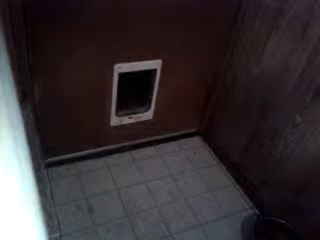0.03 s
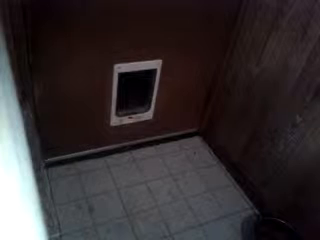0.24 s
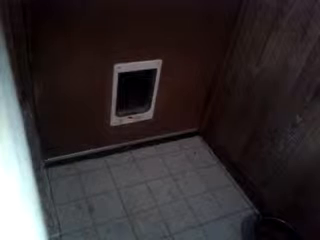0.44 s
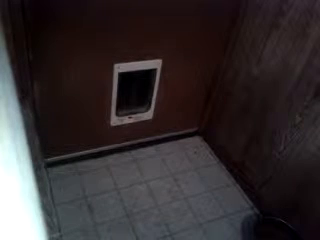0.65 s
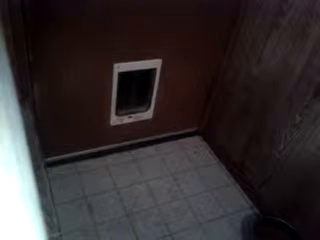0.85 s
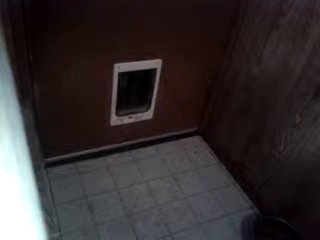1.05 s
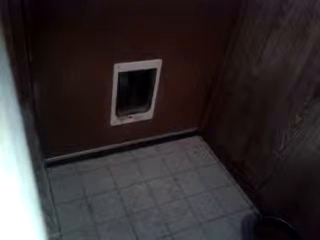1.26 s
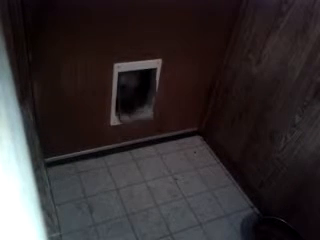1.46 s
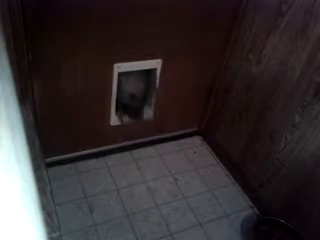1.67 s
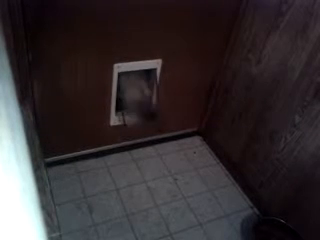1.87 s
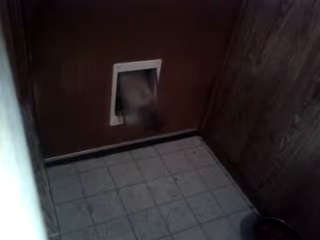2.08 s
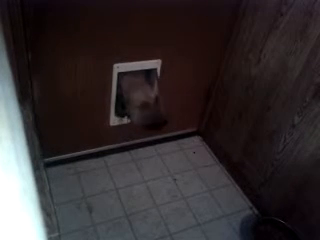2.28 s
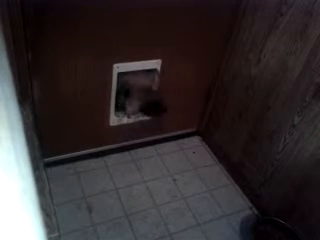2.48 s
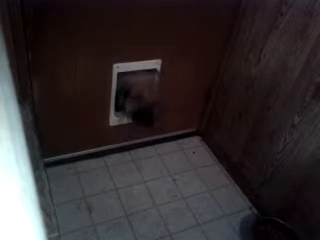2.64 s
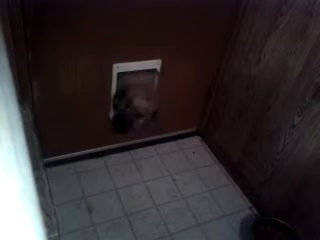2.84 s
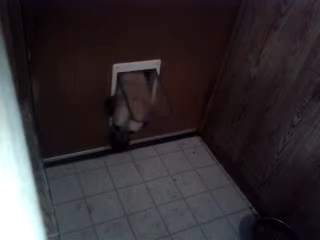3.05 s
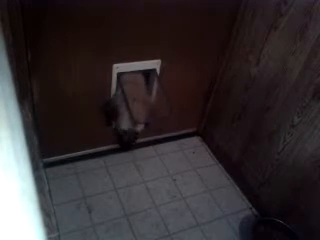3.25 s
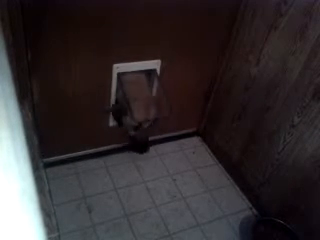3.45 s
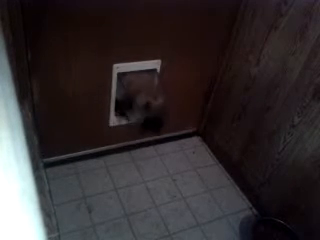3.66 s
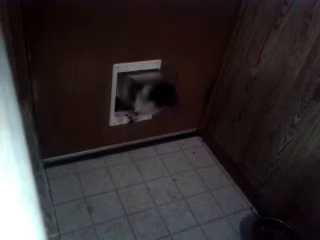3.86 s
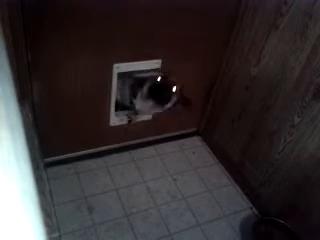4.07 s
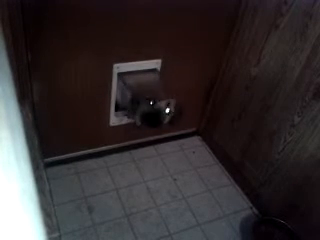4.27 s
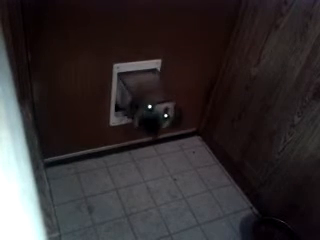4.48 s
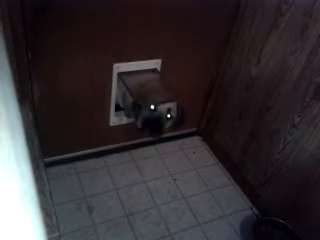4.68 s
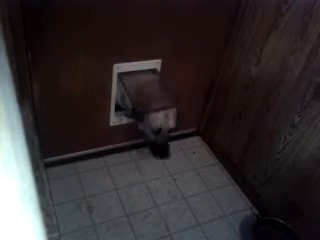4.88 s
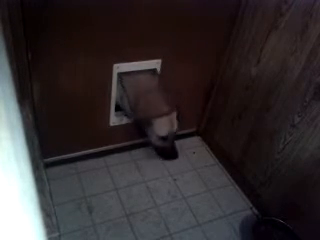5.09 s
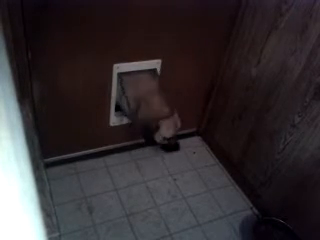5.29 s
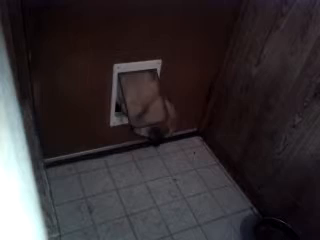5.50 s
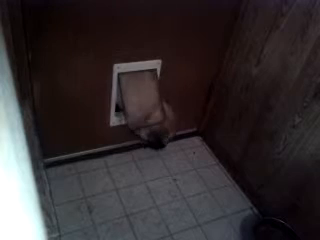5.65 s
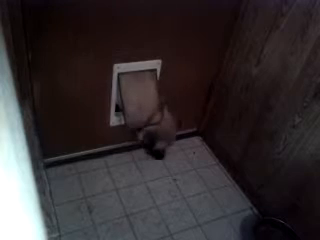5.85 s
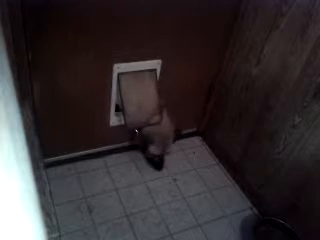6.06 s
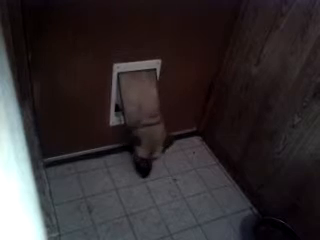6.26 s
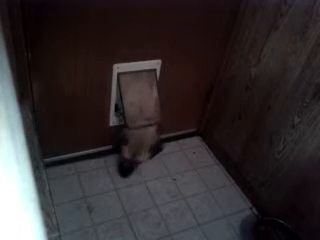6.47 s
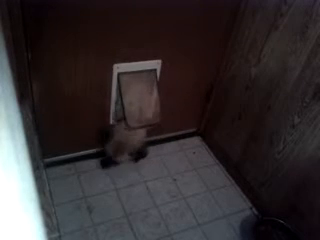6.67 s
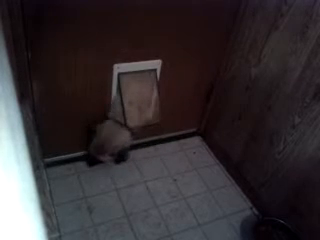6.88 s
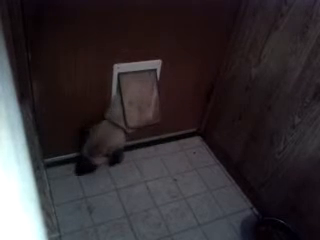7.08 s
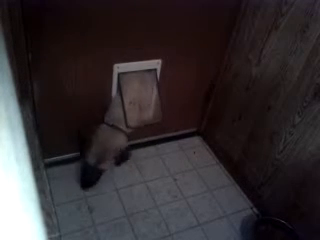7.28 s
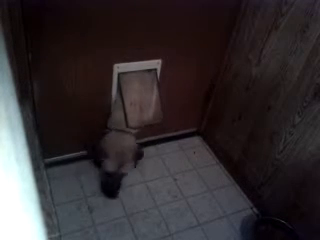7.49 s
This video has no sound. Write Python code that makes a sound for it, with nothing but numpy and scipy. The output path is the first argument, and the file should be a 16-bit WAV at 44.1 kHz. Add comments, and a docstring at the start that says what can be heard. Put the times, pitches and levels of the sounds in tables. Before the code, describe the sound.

In a small tiled room, a plastic pet door knocks and rattles in uneven clusters as a dog squeezes through, making the wooden door boom hollowly. Brushing fur and small metal tag clinks mix with the busiest clatter. The bumps then grow sparser and softer, with a low groan from the door near the end. A faint hum, microphone hiss and thin buzz continue underneath.

```python
"""A dog squeezes through a plastic pet flap into a small tiled room.
A faint machine hum, microphone hiss and a thin buzz run throughout. At 1.5 s the dog noses the flap:
flap and frame knock and set the hollow wooden door booming. From 2.3 s collar tags clink, then fur
rubs along the rattling flap. The heaviest bump lands near 4.3 s and the knocks thin out. The hum
swells briefly at 5.6 s; a last rub, a soft groan of the door and a clink lead to a dull bump at 7.5 s."""
import sys
import numpy as np
from scipy import signal
from scipy.fft import rfft, irfft, next_fast_len
from scipy.io import wavfile
from scipy.ndimage import uniform_filter1d

SR = 44100
rng = np.random.default_rng(int(sys.argv[2]) if len(sys.argv) > 2 else 0)


def int16_out(signal):
    """Quantize to a 16-bit WAV file."""
    q = np.round(np.clip(np.atleast_2d(signal).T, -1, 1) * 32767)
    wavfile.write(sys.argv[1], SR, q.astype(np.int16))


N = 332204
RING_TIME = np.arange(SR) / SR  # the one second each hit has to ring out


def amp(db):
    """Decibels to gain."""
    return 10 ** (np.asarray(db) / 20)


def unit(x):
    """Scale to rms 1."""
    return x / np.sqrt(np.mean(x ** 2))


def between(ends, share):
    """The value a share of the way from one end to the other."""
    return ends[0] + share * (ends[1] - ends[0])


def add(out, start_s, x):
    """Mix x in at its cue."""
    i = max(int(start_s * SR), 0)
    out[i:i + len(x)] += x[:max(len(out) - i, 0)]


def colour(x, curve):
    """EQ a steady sound with a curve of (frequency [Hz], level [dB]) points, at rms 1."""
    hz, db = np.transpose(curve)
    size = next_fast_len(len(x))
    bin_hz = np.maximum(np.arange(size // 2 + 1) * SR / size, 1)
    eq = amp(np.interp(np.log(bin_hz), np.log(hz), db))
    return unit(irfft(rfft(x, size) * eq, size)[:len(x)])


def wander(rate_hz):
    """Smooth random modulation at rms 1."""
    hold = int(SR / rate_hz)
    steps = np.repeat(rng.standard_normal(N // hold + 1), hold)
    return unit(uniform_filter1d(uniform_filter1d(steps, hold), hold)[:N])


def fade(t60):
    """Exponential decay, 60 dB down after t60 seconds."""
    return np.exp(-np.log(1000) * RING_TIME / t60)


def modes(table):
    """One decaying sine for each mode."""
    return np.array([amp(db) * fade(t60) * np.sin(2 * np.pi * hz * RING_TIME) for hz, db, t60 in table])


def swell(length_s):
    """A smooth fade in and out."""
    return np.hanning(int(length_s * SR))


def resonate(x, hz, q, db):
    """Layer a resonant band of x back over it."""
    return x + amp(db) * signal.lfilter(*signal.iirpeak(hz, q, fs=SR), x)


# EQ of the room air and hiss: (frequency [Hz], relative level [dB])
AIR_EQ = [(12, -32.5), (20, -5), (36, -0.5), (59, 4), (102, -11.5), (184, -10.5), (236, -12.5),
          (288, -10.5), (406, -19), (460, -16.5), (589, -18), (1470, -30), (1970, -28), (2720, -32.5),
          (6450, -35), (7300, -43.5), (9490, -77), (16100, -120)]


def room_tone(level_db=-54.5, flutter_db=-0.1):
    """A bed of room air and microphone hiss, its level barely moving."""
    air = colour(rng.standard_normal(N), AIR_EQ)
    return air * amp(level_db + flutter_db * wander(2.1))


# EQ of the buzz: (frequency [Hz], relative level [dB])
BUZZ_EQ = [(300, -22), (600, -3.5), (1200, -0.5), (1600, -2), (2050, 1.5), (2400, -8), (4000, -15),
           (7000, -21)]


def microphone_buzz(pitch_hz=94.4, level_db=-73):
    """Evenly spaced ticks fuse into a thin buzz."""
    cycles = np.cumsum(pitch_hz * (1 + .001 * wander(4))) / SR
    ticks = np.diff(np.floor(cycles), prepend=0)
    return amp(level_db) * colour(ticks - ticks.mean(), BUZZ_EQ)


# Tones of the machine's drone: (frequency [Hz], level [dB], wobble depth [ratio])
HUM_TONES = [(37, -80.5, 0.35), (53.05, -57, 0.2), (58.2, -58.5, 1), (85.4, -76, 0.17), (114.9, -67, 0.86),
             (182.2, -68, 0.17), (237.9, -62, 0.15), (355.5, -77.5, 0.2), (401, -72, 0.092)]


def machine_hum(drift_hz=0.585):
    """Low machine tones beat and wander."""
    out = np.zeros(N)
    for hz, db, wobble in HUM_TONES:
        phase = 2 * np.pi * np.cumsum(hz + drift_hz * wander(3.062)) / SR
        tone = (1 + wobble * wander(11)) * np.sin(phase)
        smear = wobble * wander(12) * np.cos(phase)
        out += amp(db) * unit(tone + smear)
    return out


# Low swell cues: (time [s], length [s], pitch [Hz], peak level [dB])
# The 58 Hz cue is a brief swell of the machine hum; in the others the door gives under the dog's weight.
LOW_SWELLS = [(1.89, 0.058, 45, -40), (2.88, 0.11, 148.7, -48.5), (3.212, 0.094, 154, -36),
              (4.28, 0.34, 37.8, -45.5), (4.94, 0.19, 150.6, -48.5), (5.571, .13, 58, -43.5),
              (6.05, 0.34, 178.2, -57), (6.95, 0.56, 157.4, -57.5)]


def low_swells(waver=0.024):
    """Single low tones fade in and out, slightly unsteady in pitch."""
    out, drift = np.zeros(N), wander(30)
    for start_s, length_s, hz, db in LOW_SWELLS:
        envelope = swell(length_s)
        pitch = hz * (1 + waver * drift[int(start_s * SR):][:len(envelope)])
        tone = np.sqrt(2) * np.sin(2 * np.pi * np.cumsum(pitch) / SR)
        add(out, start_s, amp(db) * envelope * tone)
    return out


# Fur cues: (time [s], length [s], peak level [dB])
FUR_RUBS = [(2.55, 0.35, -52), (2.939, 0.14, -46.5), (3.05, 0.15, -49.5), (3.396, 0.32, -55.5),
            (3.894, 0.22, -59.5), (6.71, 0.28, -57)]
# EQ of fur on plastic: (frequency [Hz], relative level [dB])
FUR_EQ = [(150, -31), (400, 12.5), (800, 6), (1200, 1), (1800, -10), (2300, -7.5), (2650, -8.5),
          (3300, -14), (5000, -24.5), (7000, -27.5)]


def fur_rubs(grain_db=2.5):
    """Hair catches and slips on the flap's edge in quick, grainy strokes."""
    pressure = np.zeros(N)
    for start_s, length_s, db in FUR_RUBS:
        add(pressure, start_s, amp(db) * swell(length_s))
    grain = amp(grain_db * wander(250))
    return pressure * colour(rng.standard_normal(N) * grain, FUR_EQ)


# The large tag's two modes, then the small tag's one: (frequency [Hz], relative level [dB], t60 [s])
TAG_MODES = [(6280, -3, .11), (6376, 0, .13), (7100, 8, .13)]
# Clink cues: (time [s], level before the tags' gain [dB], scrape trim [dB])
TAG_CLINKS = [(2.27, -57, -4), (2.597, -55, -2.5), (2.976, -55, -8), (3.041, -60.5, 3),
              (4.024, -47.5, -1.5), (4.041, -49, -5), (4.488, -65, -9), (5.351, -54.5, -3), (5.85, -64, -1),
              (6.477, -56.5, -6), (7.123, -62, 7)]


def collar_tags(gain_db=-8, small_tag_db=-14, room_db=-3, room_t60=.18, scrape_t60=.22, low_cut_hz=2400):
    """Two metal discs scrape together and ring briefly; the tiles scatter the ring."""
    out, partials = np.zeros(N), modes(TAG_MODES)
    attack = slice(SR // 100)
    low_cut = signal.butter(2, low_cut_hz, "highpass", fs=SR, output="sos")
    direct = partials[0] + partials[1] + amp(small_tag_db) * partials[2]
    for start_s, db, scrape_db in TAG_CLINKS:
        echoes = rng.standard_normal(SR) * fade(room_t60)
        reverb = signal.fftconvolve(direct, echoes / np.linalg.norm(echoes))[:SR]
        ring = direct + amp(room_db) * reverb
        scrape = 2 * signal.sosfilt(low_cut, rng.standard_normal(SR) * fade(scrape_t60))
        clink = ring / np.std(ring[attack]) + amp(scrape_db) * scrape
        add(out, start_s, amp(db + gain_db) * clink)
    return out


def hits(cues, thud_range_db, return_s, rebound_db, rebound_hardness, cushion_s):
    """Each hit and its cushioned rebound as the part swings back; ranges run softest to hardest."""
    contact_range_s = (0.0024, 0.0022)
    for start_s, db, hardness, spot_hz in cues:
        thud_db = between(thud_range_db, hardness)
        yield start_s, db, hardness, spot_hz, thud_db, between(contact_range_s, hardness)
        yield start_s + return_s, db + rebound_db, rebound_hardness * hardness, spot_hz, thud_db, cushion_s


# Bump cues: (time [s], level before band trims [dB], hardness [0-1], pitch the spot favours [Hz])
FRAME_BUMPS = [(1.461, -35, 0.53, 570), (1.479, -33, 0.49, 290), (1.558, -42, 0.53, 750),
               (1.66, -44, 0.34, 482), (1.929, -38.5, 0.44, 500), (1.951, -33.5, 0.19, 1040),
               (2.079, -29, 0.42, 295), (2.2, -38, .03, 333), (2.562, -40.5, 0.65, 770),
               (2.665, -39, 0.5, 440), (2.686, -34, .45, 620), (2.709, -30, 0.3, 720),
               (2.772, -35, 0.44, 620), (2.81, -33.5, 0.26, 490), (2.831, -37, 0.1, 555),
               (2.955, -33.5, 0.61, 890), (3.528, -41.5, 0.57, 350), (3.762, -35, 0.61, 655),
               (3.799, -32.5, 0.54, 690), (3.958, -48, 0.71, 410), (4.131, -44.5, 0.25, 560),
               (4.259, -27, 0.26, 700), (4.275, -38, .05, 360), (4.616, -44, 0, 350), (4.798, -40, 0, 517),
               (5.184, -35.5, 0.4, 516), (5.692, -40, .15, 445), (5.75, -44.5, .3, 447),
               (6.899, -42, 0.17, 610), (7.482, -50.5, .03, 605)]


def frame_bumps():
    """The dog's body bumps the frame and the door behind it; softer hits carry more thud."""
    return hits(FRAME_BUMPS, thud_range_db=(3, -4.5), return_s=.044,
                rebound_db=-10, rebound_hardness=0.62, cushion_s=0.0071)


# Clack cues: (time [s], level before band trims [dB], hardness [0-1], pitch the spot favours [Hz])
FLAP_CLACKS = [(1.497, -41, .45, 500), (2.057, -32, 0.59, 540), (2.106, -36.5, 0.45, 720),
               (2.574, -36, 0.82, 3640), (2.597, -37.5, 0.75, 3600), (2.617, -30, .53, 1110),
               (2.975, -36.5, .55, 340), (3.043, -42, .8, 2600), (3.095, -40, 0.89, 950),
               (3.125, -41, 0.83, 2630), (3.164, -41, 0.76, 900), (3.297, -37.5, 1, 3100),
               (3.424, -36.5, 0.82, 2600), (3.876, -49.5, 0.74, 750), (4.25, -38.5, 0.87, 2630),
               (5.918, -40.5, 0.7, 450)]


def flap_clacks():
    """The light flap clacks by itself, with little low end and a quick rebound."""
    return hits(FLAP_CLACKS, thud_range_db=(-10.5, -9.5), return_s=.02,
                rebound_db=-5, rebound_hardness=0.76, cushion_s=0.011)


# Modes of the door panel, frame and flap: (frequency [Hz], relative level [dB], t60 [s])
DOOR_MODES = [(151.4, -3, 1), (167.5, 4, 0.22), (190, -13, 0.99), (219.1, 4, 0.22), (250.2, -3, 0.31),
              (292.7, -2.5, 0.43), (354.8, -0.5, 0.38), (395, -10.5, 0.54), (448.3, 4, 0.25),
              (491.2, 1.5, .26), (519, -1.5, 0.11), (548.5, -4.5, 0.2), (600, -2, 0.22), (649, -7.5, 0.32),
              (684, -0.5, 0.15), (748.5, -2, 0.14), (817.5, -8, .2), (932, -15.5, 0.18), (995, -12, 0.26),
              (1068, -8, 0.22), (1150, -13, .2), (1200, -10.5, 0.22), (1403, -9, 0.15), (1450, -29.5, 0.23),
              (1824, -15.5, 0.15), (2435, -25, 0.21), (2550, -28.5, .25), (2670, -21, 0.23),
              (2880, -26, 0.18), (3120, -20.5, 0.092), (3500, -25, 0.12)]
# EQ of the dense ring of plastic and tiled room: (frequency [Hz], relative level [dB])
CLATTER_EQ = [(100, 0), (170, -7.5), (320, -4.5), (500, 5), (720, -7), (880, -7.5), (1100, -6.5),
              (1350, -12.5), (1800, -15.5), (2200, -22), (2800, -22), (4000, -28), (5500, -35), (7000, -40)]
# A knock's four bands, thud, body, plastic and click: (low edge [Hz], high edge [Hz])
KNOCK_BANDS = [(110, 300), (300, 900), (900, 2200), (2200, 7000)]
# Mix of each band: (trim [dB], clatter t60 [s], clatter send [dB], crack against reflections [dB])
BAND_MIX = [(-5, .27, -1, 4), (-5, 0.38, -4.5, 6.5), (-5, 0.34, -1, 5), (-6, 0.2, 5, -4.5)]


def door_knocks(blows, crack_s=0.0071, build_s=.006, scatter_db=2, spot_db=5, spot_octaves=0.2,
                flip_chance=.25, plastic_range_db=(-19.5, 2), click_range_db=(-47.5, -2)):
    """Each blow cracks, rings the door's modes and leaves a dense clatter; harder blows are brighter."""
    out, partials = np.zeros(N), modes(DOOR_MODES)
    attack = slice(SR // 40)
    mode_hz = np.array(DOOR_MODES)[:, 0]
    filters = [signal.butter(3, band, "bandpass", fs=SR, output="sos") for band in KNOCK_BANDS]
    # the direct crack comes first, then reflections from the near walls pile up
    crack = np.exp(-RING_TIME / crack_s)
    reflections = 1 - np.exp(-RING_TIME / build_s)
    tails = [amp(send_db) * (amp(crack_db) * crack + reflections) * fade(t60)
             for _, t60, send_db, crack_db in BAND_MIX]
    # the hollow of the door gathers the clatter into one broad resonance
    clatter_bed = colour(rng.standard_normal(N), CLATTER_EQ)
    clatter_bed = unit(resonate(clatter_bed, hz=490, q=5, db=-1))
    # the loose plastic starts chattering a moment after the panel moves
    chatter_lag = 1 - .4 * np.exp(-RING_TIME / .006)
    for start_s, db, hardness, spot_hz, thud_db, contact_s in blows:
        # each spot favours its own modes, and some start in opposite polarity
        favour_db = spot_db * np.exp(-(np.log2(mode_hz / spot_hz) / spot_octaves) ** 2)
        polarity = np.sign(rng.random(len(partials)) - flip_chance)
        mode_gains = amp(favour_db + scatter_db * rng.standard_normal(len(partials)))
        ring = (polarity * mode_gains) @ partials
        ring /= np.std(ring[attack])
        clatter = clatter_bed[rng.integers(N - SR):][:SR]
        clatter = resonate(clatter, hz=spot_hz, q=7, db=-1)
        # a cushioned blow has a slower attack
        rise = 1 - np.exp(-RING_TIME / max(contact_s, 1 / SR))
        layers = ((thud_db, rise), (0, rise),
                  (between(plastic_range_db, hardness), rise * chatter_lag),
                  (between(click_range_db, hardness), rise * chatter_lag))
        for bandpass, tail, (trim_db, *_), (layer_db, onset) in zip(filters, tails, BAND_MIX, layers):
            band = signal.sosfilt(bandpass, ring + clatter * tail)
            gain = amp(db + layer_db + trim_db) / np.std(band[attack])
            add(out, start_s, gain * onset * band)
    return out


def scene():
    """The door, the low swells, the dog and the room bed, mixed to mono."""
    door = door_knocks([*frame_bumps(), *flap_clacks()])
    swells = low_swells()
    dog = fur_rubs() + collar_tags()
    bed = machine_hum() + room_tone() + microphone_buzz()
    return (door + swells + dog + bed)[None]


def record(dry):
    """The recorder cuts the treble steeply above 7350 Hz."""
    high_cut = signal.ellip(10, .2, 70, 7350, fs=SR, output="sos")
    return signal.sosfilt(high_cut, dry)


dry = scene()
out = record(dry)
int16_out(out)
```